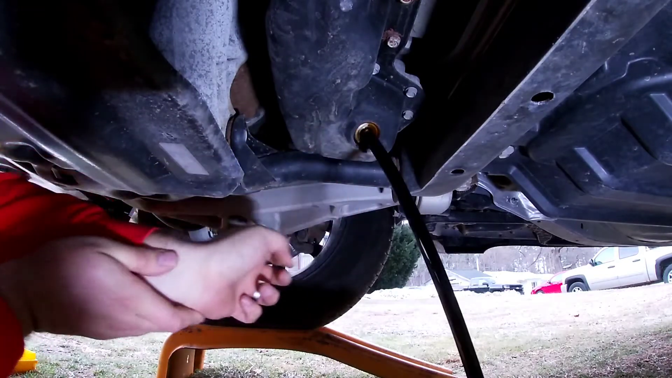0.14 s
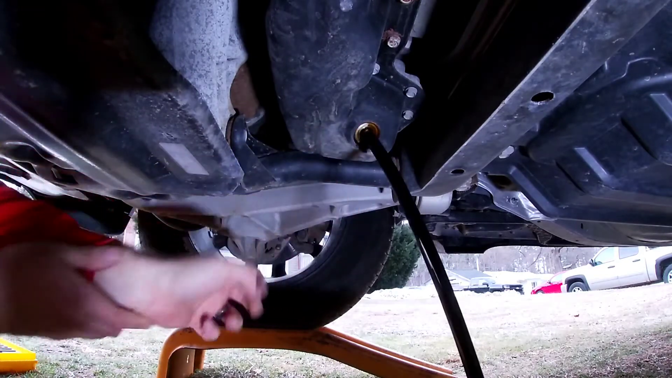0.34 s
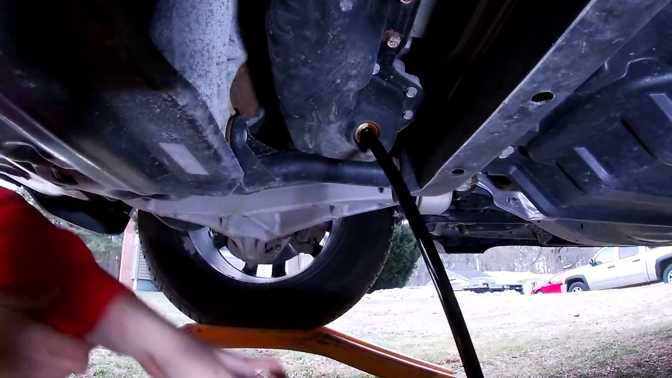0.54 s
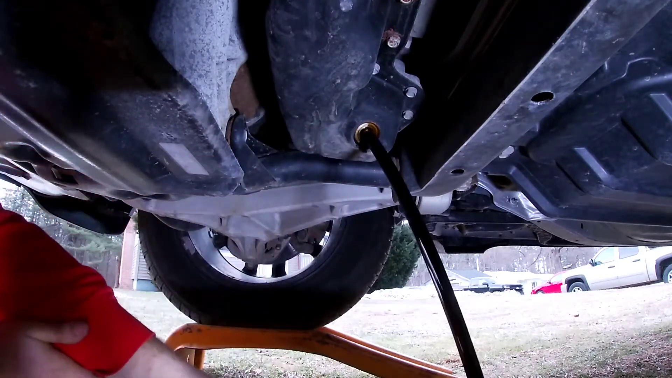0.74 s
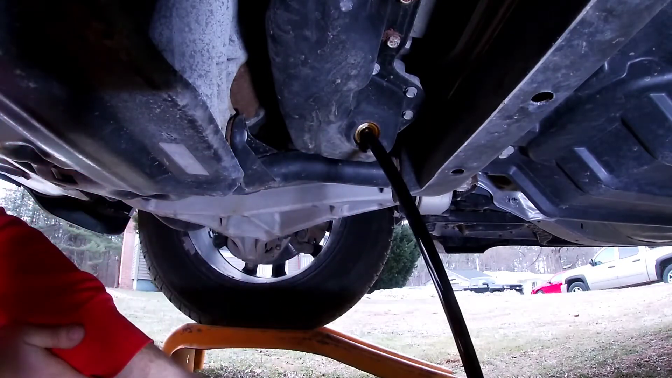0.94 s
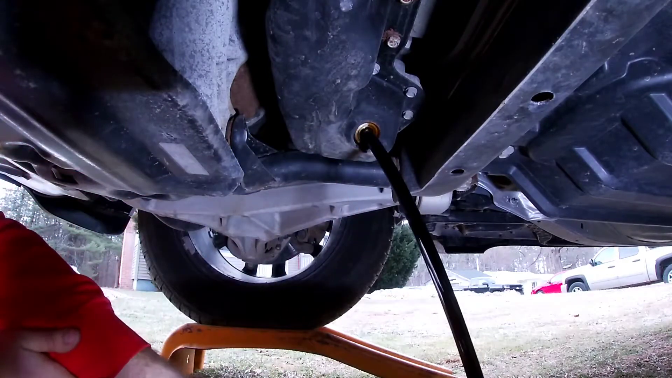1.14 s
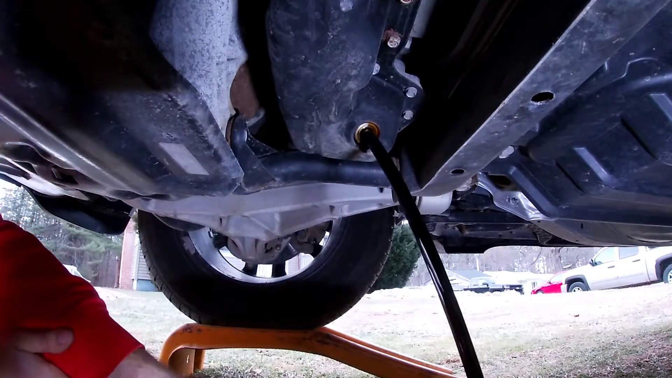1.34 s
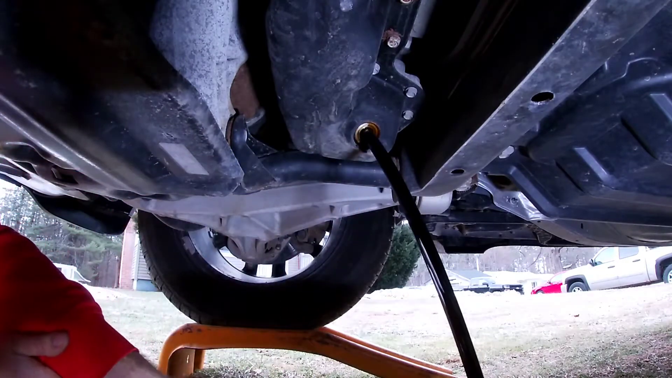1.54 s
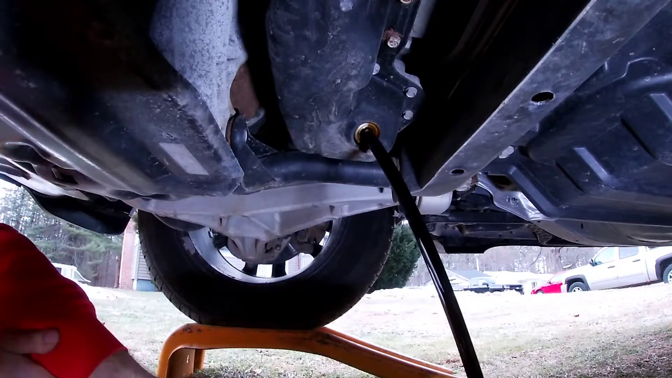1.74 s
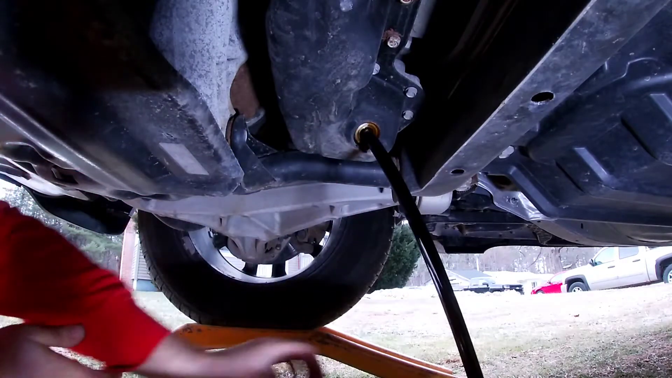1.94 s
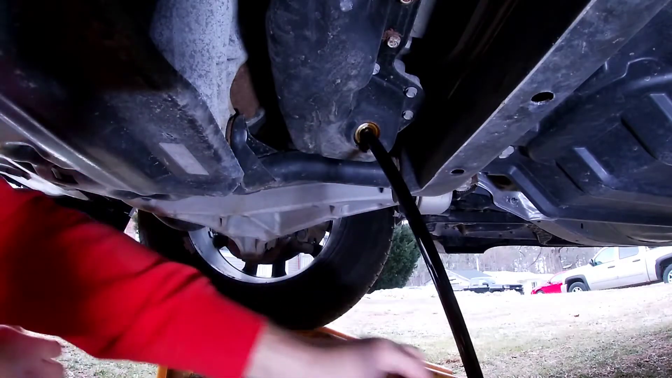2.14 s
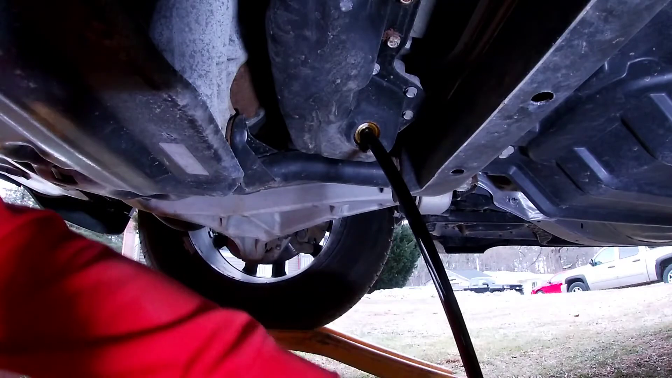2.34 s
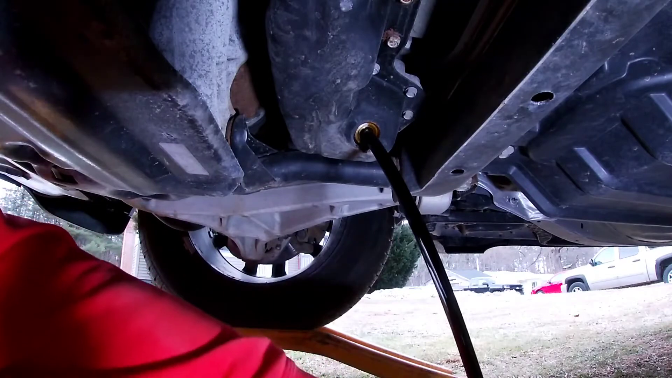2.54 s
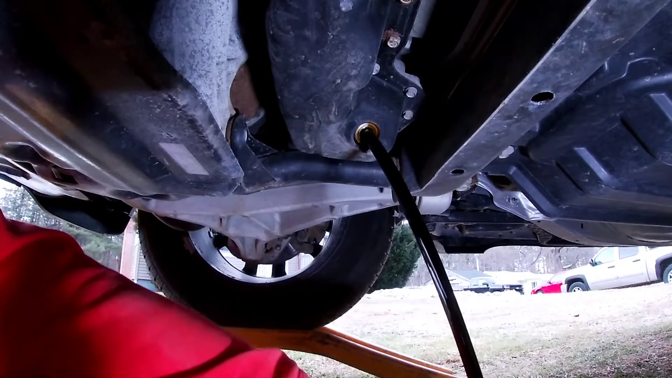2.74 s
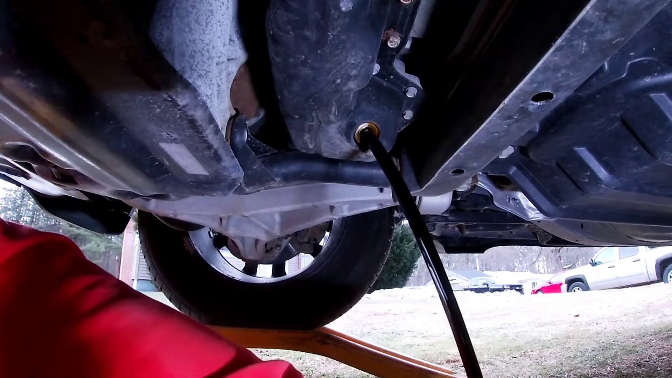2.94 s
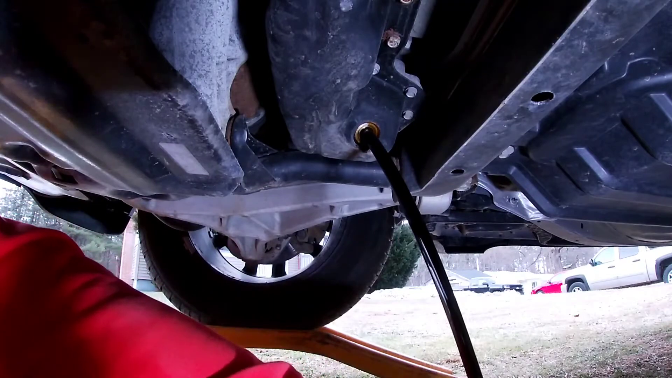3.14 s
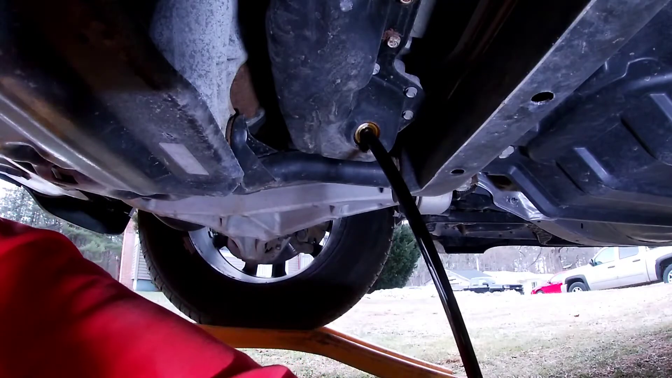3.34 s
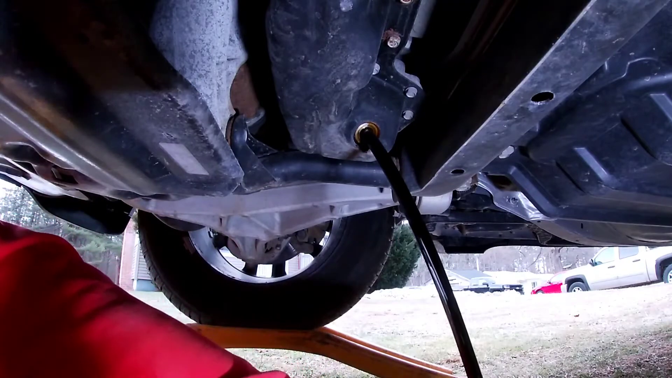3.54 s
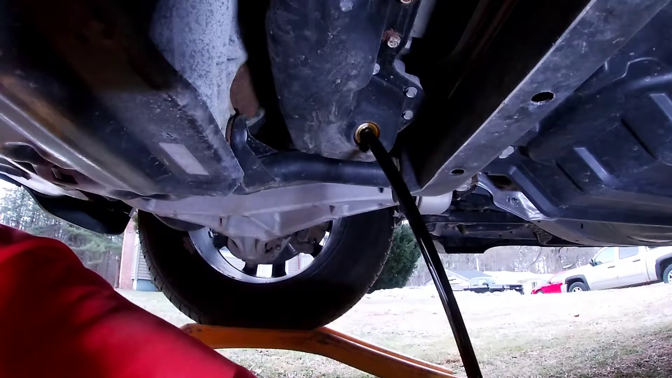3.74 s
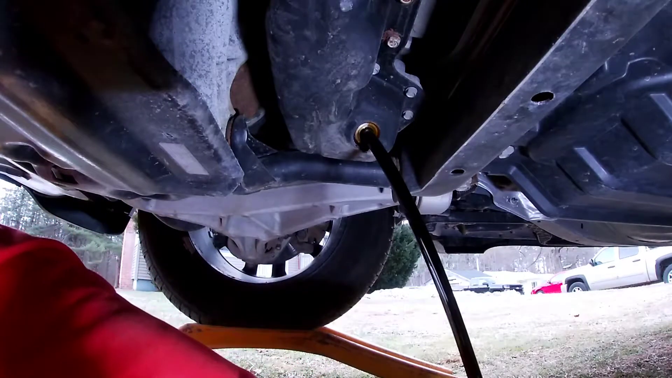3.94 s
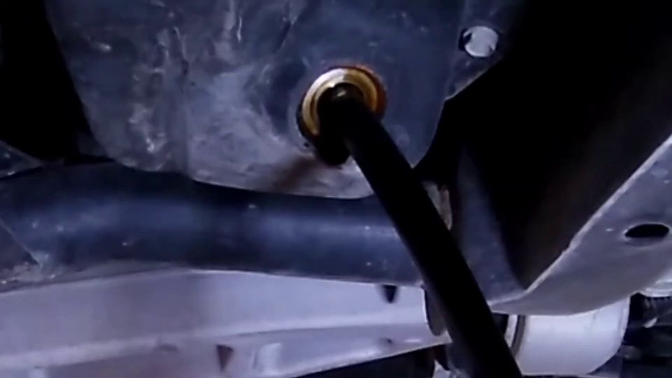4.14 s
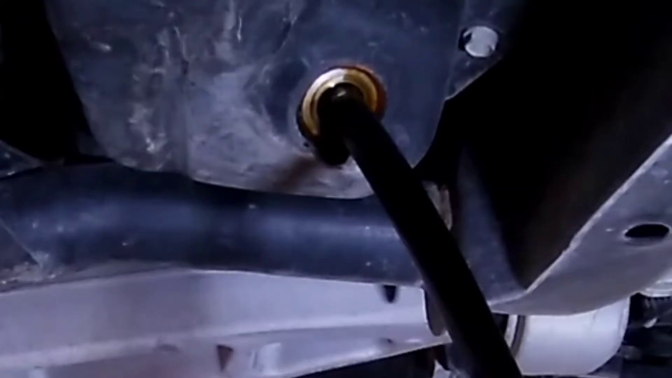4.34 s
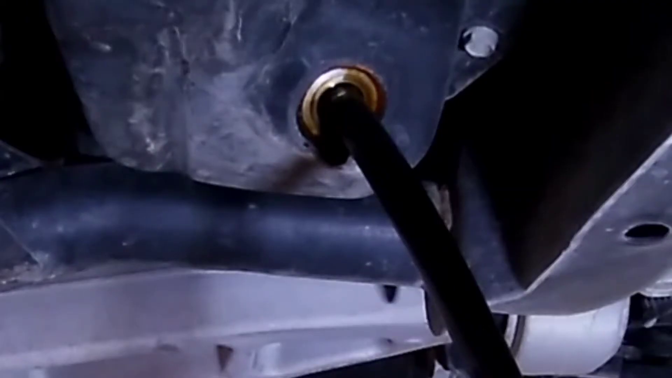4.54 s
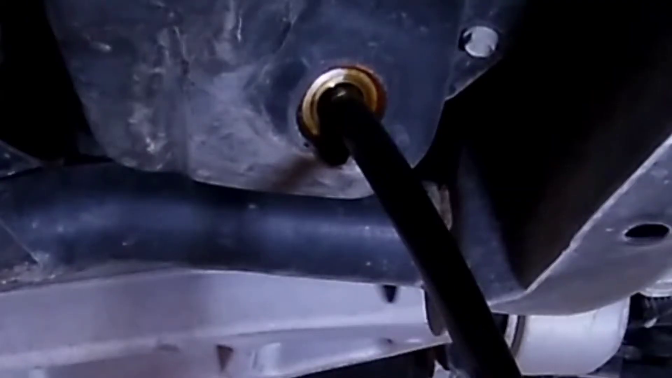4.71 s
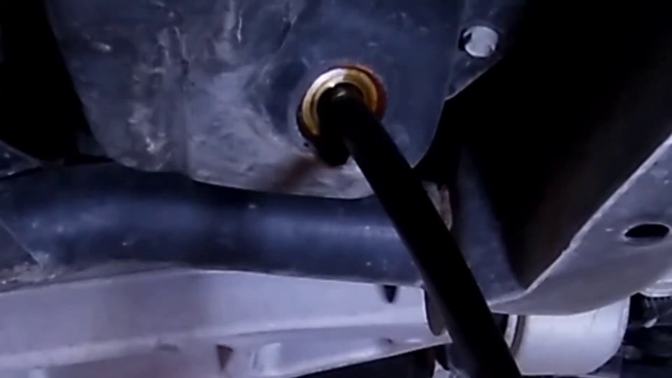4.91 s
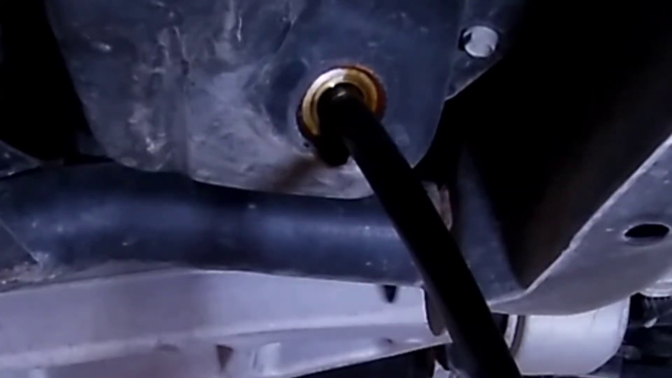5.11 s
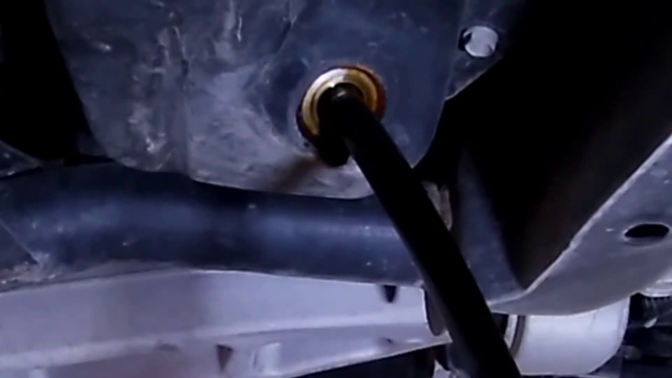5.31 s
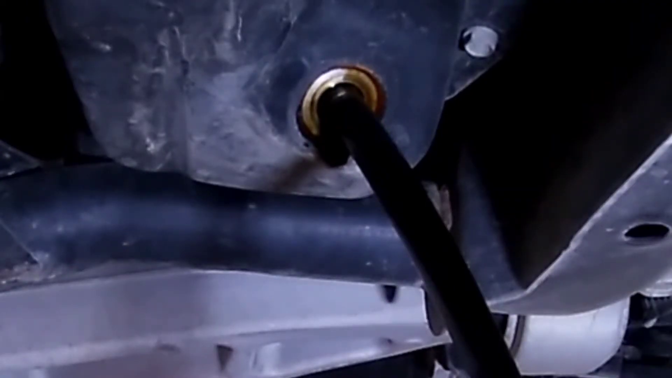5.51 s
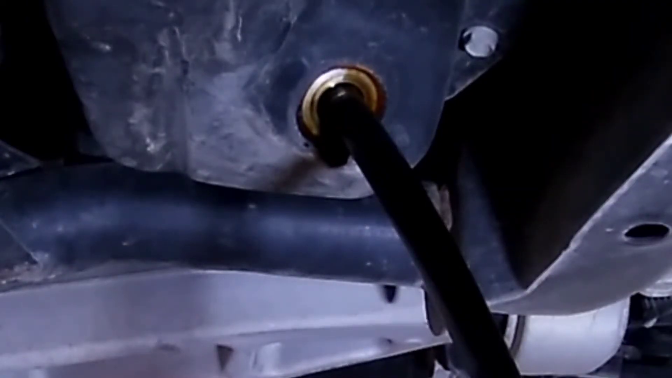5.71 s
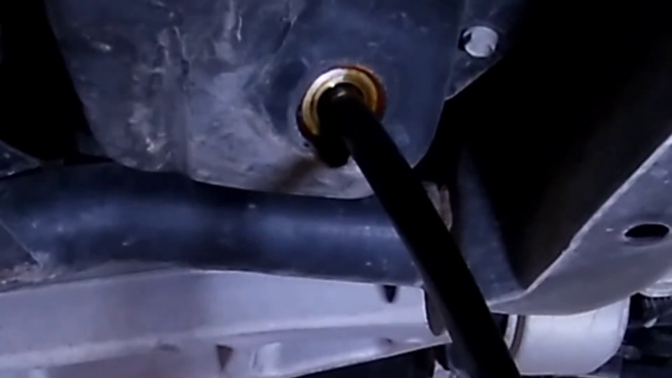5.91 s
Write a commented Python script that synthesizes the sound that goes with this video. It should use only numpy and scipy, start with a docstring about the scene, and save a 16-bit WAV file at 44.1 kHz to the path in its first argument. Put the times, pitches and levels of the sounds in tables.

```python
"""Under a car outdoors, close to the pan: far traffic and faint air lie behind a thin sizzle of landing oil. A
drain plug scrapes free as dying steel tones fed by grit, then knocks about in a plastic pan's modes. A sleeve
brushes by now and then as cloth hiss; the oil, noise coloured by the pan, soon slaps and pops, its bubbles
short gliding tones, a few lumps of it thud into the pan, and late on the pool gulps low. Ground and car floor
give the near sounds a short echo; a small microphone dulls the treble."""
import sys
import numpy as np
from scipy import signal
from scipy.fft import rfft, irfft, next_fast_len
from scipy.io import wavfile
from scipy.ndimage import uniform_filter1d, map_coordinates

SR = 44100
rng = np.random.default_rng(int(sys.argv[2]) if len(sys.argv) > 2 else 0)


def materialize(psi):
    """Save the field psi as 16-bit PCM at rate SR to the path in sys.argv[1].

    A 1-D psi becomes a single channel; in a 2-D psi each row is a channel.
    """
    bounded = np.clip(np.atleast_2d(psi).T, -1, 1)
    quanta = np.round(bounded * 32767).astype(np.int16)
    wavfile.write(sys.argv[1], SR, quanta)


N = 267687

# lumps of oil slapping the pool: (time [s], level [dB], pitch [Hz])
SLAP_EVENTS = [(1.949, -35.5, 2240), (2.033, -34, 1650), (2.108, -37, 1770), (2.24, -34, 1070),
               (2.344, -37, 1616), (2.366, -36, 1640), (2.515, -36.5, 987), (2.628, -42.5, 1374),
               (2.915, -38, 1660), (3.09, -41.5, 1046), (3.127, -38.5, 1670), (3.416, -39.5, 2616),
               (3.487, -38, 1645), (3.844, -41, 1610), (4.069, -42, 1630), (4.155, -34.5, 2220),
               (4.42, -37, 1030), (4.474, -37, 2640), (4.815, -31.5, 2650), (4.848, -30, 2690),
               (4.958, -33, 2540), (4.994, -36.5, 2640), (5.065, -37, 1640), (5.137, -40, 1610),
               (5.176, -37.5, 2620), (5.504, -41, 944), (5.567, -37, 1004), (5.781, -35, 967),
               (5.83, -38, 2910), (5.959, -38.5, 2520)]
# bubbles popping: (time [s], level [dB], pitch [Hz])
POP_EVENTS = [(1.8777, -44, 7940), (1.9284, -39, 3780), (2.0351, -32.5, 2980), (2.2337, -33.5, 5400),
              (2.3656, -33.5, 7830), (2.4207, -38.5, 6630), (2.521, -33, 3000), (2.6285, -36.5, 6350),
              (2.7714, -41.5, 5720), (3.0299, -35.5, 7420), (3.0902, -32.5, 3430), (3.144, -40, 3780),
              (3.2552, -31, 2964), (3.3309, -36, 4050), (3.407, -33, 4790), (3.4489, -34.5, 7700),
              (3.4798, -33, 8100), (3.598, -39, 6640), (3.6709, -39, 5560), (3.7584, -39.5, 3620),
              (3.839, -34, 3310), (4.0715, -29, 6660), (4.1039, -57, 5270), (4.1204, -30.5, 8270),
              (4.43, -31.5, 7440), (4.4735, -33.5, 6180), (4.6733, -38.5, 4330), (4.7416, -38, 4730),
              (4.8028, -38, 3900), (4.813, -35, 3150), (4.8477, -28.5, 3200), (4.9898, -33, 5920),
              (5.0033, -33, 4750), (5.068, -45, 5600), (5.176, -32, 6320), (5.289, -36, 7300),
              (5.3715, -31, 4120), (5.4254, -31, 6150), (5.5058, -26.5, 5800), (5.542, -38.5, 3830),
              (5.6745, -29.5, 4870), (5.7811, -30, 3550), (5.834, -31, 3630), (5.8624, -44, 4300),
              (5.8923, -38.5, 6200), (5.9596, -39.5, 4980), (6.0205, -33, 6060), (6.033, -31.5, 6000)]
# response of the small microphone: (frequency [Hz], level [dB])
MIC_RESPONSE = [(20, -1), (7000, 1), (8500, -8.5), (10000, -24.5), (12500, -36), (15000, -55.5)]


def amp(db):
    """Amplitude of a level in dB."""
    return 10 ** (np.asarray(db) / 20)


def unit(x):
    """x at an rms of 1."""
    return x / np.sqrt(np.mean(x ** 2) + 1e-20)


def along(points, hz):
    """Curve through (Hz, value) points on a log frequency axis."""
    f, v = np.transpose(points)
    return np.interp(np.log(hz + 1), np.log(f + 1), v)


def curves(rows):
    """One value per sample for each column after the time."""
    s, *cols = np.transpose(rows)
    return [np.interp(np.arange(N) / SR, s, c) for c in cols]


def wobble(rate):
    """A smooth random curve, rate knots a second."""
    knots = rng.standard_normal(int(N * rate / SR) + 4)
    return map_coordinates(knots, [np.arange(N) * rate / SR])


def filtered(x, response):
    """x shaped by a response of frequency."""
    m = next_fast_len(N + SR // 2)
    return irfft(rfft(x, m) * response(np.fft.rfftfreq(m, 1 / SR)), m)[..., :N]


def microphone(hz):
    """Amplitude the microphone passes at each frequency."""
    return amp(along(MIC_RESPONSE, hz))


def at_microphone(x, spectrum):
    """x given a spectrum as picked up: its rms is 1 once the microphone has dulled it."""
    x = filtered(x, lambda f: amp(along(spectrum, f) - along(MIC_RESPONSE, f)))
    return x / np.std(filtered(x, microphone))


def ring(modes, t, damping, tilt_db=0, detune=0.019, spread_db=2):
    """Dying sines at new strengths, signs and slightly new pitches, peak 1; damping divides each t60."""
    hz, db, t60 = np.transpose(modes)[:, :, None]
    strength, pitch, sign = rng.standard_normal((3, len(modes), 1))
    level_db = db + tilt_db + spread_db * strength - 60 * t * damping / t60
    tones = np.sin(2 * np.pi * hz * (1 + detune * pitch) * t)
    x = np.sum(np.sign(sign) * amp(level_db) * tones, axis=0)
    return x / np.abs(x).max()


def add(out, s, x):
    """Mix x into out from second s."""
    out[round(s * SR):][:len(x)] += x


def crackle(rate, spread_db):
    """Tiny impacts of unequal size, rate a second on average."""
    hit = rng.random(N) < rate / SR
    return hit * rng.standard_normal(N) * amp(spread_db * np.minimum(rng.exponential(size=N), 2))


def spatter(rate, t60):
    """Loudness of ragged bursts: each starts fast and dies away."""
    t = np.arange(SR // 10) / SR
    burst = amp(-60 * t / t60) * (1 - np.exp(-t / 0.00096))
    return unit(signal.fftconvolve(np.abs(crackle(rate, spread_db=0.0)), burst)[:N])


def patchy(x, depth_db):
    """Small patches of time and pitch swell and sink at random."""
    z = signal.stft(x, nperseg=256)[2]
    field = uniform_filter1d(rng.standard_normal(z.shape), size=5, axis=0)  # smooth in pitch
    field = uniform_filter1d(field, size=10, axis=1)  # smooth in time
    return signal.istft(z * amp(depth_db * unit(field)), nperseg=256)[1][:N]


def wash(events, under_db):
    """Loudness of the brief swell of noise after each event, under_db relative to the event's level."""
    rise_s, t60_s = 0.0064, 0.083
    out, t = np.zeros(N + SR), np.arange(SR // 3) / SR
    for s, db, _ in events:
        power = amp(2 * (db + under_db - 60 * t / t60_s)) * (1 - np.exp(-t / rise_s))
        add(out, s, power)
    return np.sqrt(out[:N])


def blip(hz, t60, rise, noisy):
    """A burst bubble: a short unsteady tone gliding upward, with a puff of spray at its start."""
    t = np.arange(SR // 12) / SR
    shake = unit(uniform_filter1d(rng.standard_normal((2, len(t))), size=30, axis=1))
    phase = 2 * np.pi * hz * t * (1 + rise * t / t60) + 0.47 * shake[0]
    tone = np.sin(phase) * (1 + 0.36 * shake[1])
    puff = noisy * amp(-60 * t / 0.024) * np.diff(rng.standard_normal(len(t) + 1))
    return (1 - np.exp(-t / .0007)) * (amp(-60 * t / t60) * tone + puff)


def open_air():
    """A faint even hiss of the open air, noise with its bass rolled off."""
    return amp(-75) * unit(filtered(rng.standard_normal(N), lambda f: (f / (f + 1500)) ** 2))


def traffic():
    """A low far rumble of drifting noise; its deepest part, a narrow band, throbs by itself."""
    # spectrum of the far rumble: (frequency [Hz], density [dB per Hz])
    rumble_spectrum = [(12, -33), (20, -8.5), (54, -0.5), (81, -6), (107, -2.5), (163, -4), (204, -8.5),
                       (428, -18.5), (660, -22), (700, -20.5), (910, -29.5), (1540, -120)]
    rumble = unit(filtered(rng.standard_normal(N), lambda f: amp(along(rumble_spectrum, f))))
    deep = unit(filtered(rng.standard_normal(N), lambda f: 1 / (1 + ((f - 58) / 9) ** 2)))
    throb = amp(0.9 * wobble(9.4)) * deep
    level_db = -58.5 - 1.1 * wobble(9.6) + 1.3 * wobble(12)
    return amp(level_db) * (rumble + 0.52 * throb)


def sleeve():
    """A sleeve brushes past the ground and the car: smooth strokes of cloth hiss that swell and stop short."""
    # strokes: (start [s], length [s], level at the microphone [dB])
    strokes = [(.4, 0.13, -66), (0.536, 0.14, -58.5), (1.114, 0.17, -57.5), (1.615, 0.24, -63.5),
               (2.032, 0.16, -52), (4.425, 0.12, -63), (5.306, .31, -55.5)]
    # spectrum of the cloth at the microphone: (frequency [Hz], density [dB per Hz])
    cloth_spectrum = [(600, -32), (1500, 1.5), (3500, -1.5), (6000, -1.5), (8000, -2.5), (9500, -19),
                      (12500, -32), (20000, -120)]
    swell_share, stop_s = 0.64, 0.0065  # share of the stroke spent swelling; its sudden end
    t = np.arange(N) / SR
    loudness = np.zeros(N)
    for s, length, db in strokes:
        swell = (t - s) / (swell_share * length)
        stop = (s + length - t) / stop_s
        loudness += amp(db) * np.clip(np.minimum(swell, stop), 0, 1)
    hiss = patchy(rng.standard_normal(N), depth_db=0.7)
    return loudness * at_microphone(hiss, cloth_spectrum)


def scrape():
    """The plug leaves its thread: gritty threads rub and keep the steel ringing."""
    # modes of the plug and its seat: (frequency [Hz], level [dB], t60 [s])
    steel_modes = [(635, -8, .1), (921, -4, .11), (1090, -8, .05), (1500, -6, .035), (1780, -7, .04),
                   (2024, -1, .035), (2360, -3, .035), (2720, 4, .06), (3000, -5, .03), (3530, -43, .9),
                   (3575, -45, .7)]
    loudest_s, loudest_db, rise_db_per_s, fall_db_per_s = 0.061, -23, 749.5, 895.5
    lag = np.arange(N) / SR - loudest_s
    level_db = loudest_db + np.minimum(rise_db_per_s * lag, -fall_db_per_s * lag)
    grit = amp(level_db) * unit(crackle(rate=10000, spread_db=4.0))
    steel = ring(steel_modes, np.arange(SR // 2) / SR, damping=1, detune=0, spread_db=0)
    steel[0] = 3.3  # the bare grit is heard too
    rub = signal.fftconvolve(grit, steel / np.linalg.norm(steel))[:N]
    return signal.sosfilt(signal.butter(4, 520, "high", fs=SR, output="sos"), rub)


def favour_db(modes, hz, slope_db):
    """The spot struck favours modes near hz: the rest lose slope_db per octave of distance."""
    return -slope_db * np.abs(np.log2(np.array(modes)[:, :1] / hz))


def knocks():
    """The plug chatters for a few milliseconds as it knocks about, and later a few lumps of oil thud into the
    pan: each blow cracks, shakes the walls and booms in the bowl."""
    # blows of the plug, and from 3.2 s lumps of oil thudding: (time [s], level [dB], boom before trim [dB],
    # crack before trim [dB], favoured wall pitch [Hz])
    blows = [(0.281, -33.5, -26, -19, 1650), (0.29, -29.5, -7, -10, 1660), (0.31, -20.5, -3, -2.5, 800),
             (0.318, -1, -5, -13.5, 1360), (0.444, -33, -21, -26, 1740), (0.467, -40, -14, 0.5, 1270),
             (0.521, -12, -7, -30, 630), (0.535, -9, -3.5, -5.5, 1200), (0.548, -21.5, 0.5, -16, 1410),
             (0.583, -18.5, -7, -12, 1220), (0.608, -27, -3.5, -36, 1080), (0.666, -43, 2.5, -10, 1180),
             (0.809, -22.5, 0, -37, 1500), (0.819, -18, -7.5, -42, 800), (0.841, -25.5, -14, -40, 1130),
             (0.854, -30, -7, -35, 1080), (0.873, -35.5, -5, -14, 1020), (0.988, -37.5, -26, -20, 1520),
             (1.041, -45.5, -19, -25, 1440), (1.359, -28, -25, -4.5, 1270), (1.381, -43, 1, 10.5, 1350),
             (1.403, -39, -5, -20, 1040), (2.13, -42, 0.5, -12, 1650), (3.257, -16, -16.5, -18, 1230),
             (4.583, -31, -14.5, -31, 1300), (4.628, -33.5, -14, -12, 1110)]
    # modes of the pan's walls: (frequency [Hz], level [dB], t60 before damping [s])
    wall_modes = [(683, -3.5, 0.0073), (806, 2.5, 0.018), (1040, -12, 0.07), (1179, 0, 0.034),
                  (1315, -4.5, 0.03), (1475, 5, 0.022), (1627, -15.5, 0.022), (1667, 3.5, 0.0086),
                  (2040, -25.5, 0.011), (2130, -8, 0.0075), (2470, -17, .03), (2612, -8.5, 0.04),
                  (2980, -14.5, 0.063)]
    # modes of the bowl: (frequency [Hz], level [dB], t60 before damping [s])
    bowl_modes = [(56, -10, .2), (77, -6, .2), (120, -7, .13), (160, -3, .14), (230, -4, .1),
                  (280, -7, .07), (325, -3, .08), (425, -3, .07), (540, -10, .045)]
    wall_damping, bowl_damping = 0.96, 0.58  # factors on the modes' decay speed
    bowl_best_hz = 189
    jam_db = 3  # a blow this hard halves the ring of the walls
    out, t = np.zeros(N + SR), np.arange(SR // 3) / SR
    bright = signal.butter(2, 3000, "high", fs=SR, output="sos")
    for s, db, boom_db, crack_db, wall_hz in blows:
        # a hard blow presses the pan to the ground and shortens the ring of its walls
        jam = 1 + amp(db - jam_db)
        chatter = amp(-60 * t[:SR // 20] / 0.017) * rng.standard_normal(SR // 20)
        wall_tilt_db = favour_db(wall_modes, wall_hz, slope_db=7.5)
        walls = ring(wall_modes, t, wall_damping * jam, wall_tilt_db)
        walls = signal.fftconvolve(walls, chatter)[:len(t)]

        middle = signal.butter(2, [wall_hz / 3.7, wall_hz * 1.69], "band", fs=SR, output="sos")
        rattle_fall = 0.53 * amp(-60 * t * jam / 0.073) + 0.149 * amp(-60 * t / 0.087)
        rattle = rattle_fall * signal.sosfilt(middle, rng.standard_normal(len(t)))

        # the pan rocks on the ground
        loose = 1 + 0.45 * unit(uniform_filter1d(rng.standard_normal(len(t)), size=250))
        loose *= 1 + 2.35 * amp(-60 * t / 0.047)  # and gives most of its boom at once
        boom = ring(bowl_modes, t, bowl_damping, favour_db(bowl_modes, bowl_best_hz, slope_db=5.5))
        boom *= loose * (1 - np.exp(-t / 0.0021))

        crack_fall = amp(-60 * t / 0.02) + 0.094 * amp(-60 * t / 0.015)
        crack = crack_fall * signal.sosfilt(bright, rng.standard_normal(len(t)))

        blow = walls / np.abs(walls).max() + rattle
        blow += amp(boom_db - 8) * boom + amp(crack_db - 0.5) * crack
        add(out, s, amp(db) * blow)
    # a small pan radiates no deep bass
    return signal.sosfilt(signal.butter(2, 40, "high", fs=SR, output="sos"), out[:N])


def glugs():
    """The pool gulps: soft low notes of trapped air, each with an overtone and a thin gurgle singing over it."""
    # gulps: (time [s], level [dB], pitch [Hz])
    gulps = [(5.408, -31.5, 330), (5.421, -22.5, 229), (5.436, -28, 218), (5.449, -31, 263),
             (5.464, -36, 454)]
    t60_s = 0.043
    out = np.zeros(N + SR)
    for s, db, hz in gulps:
        gulp = blip(hz, t60_s, rise=0.083, noisy=0)
        overtone = amp(-9) * blip(2.38 * hz, t60_s, rise=0.11, noisy=0)
        gurgle = amp(-13) * blip(1168, t60=0.1, rise=0.12 * 0.1 / 0.1, noisy=0)
        add(out, s, amp(db) * (gulp + overtone + gurgle))
    return signal.sosfilt(signal.butter(2, 1800, fs=SR, output="sos"), out[:N])


def bubbles(spray_db):
    """The loud slaps and pops, over a random scatter of small bubbles that follows the spray."""
    out = np.zeros(N + SR)
    for s, db, hz in SLAP_EVENTS:
        add(out, s, amp(db) * blip(hz, t60=0.033, rise=0.038, noisy=0.11))
    for s, db, hz in POP_EVENTS:
        add(out, s, amp(db) * blip(hz, t60=0.022, rise=0.033, noisy=0.49))
    when, pitch, size = rng.random((400, 3)).T
    for at, p, z in zip(when * (N - 1), pitch, size):
        hz = 1200 * 5.3 ** p
        level_db = spray_db[int(at)] - 4.5 - 7.8 * np.log(z + 0.031)  # a few are much louder
        add(out, at / SR, amp(level_db) * blip(hz, 60 / hz, rise=0.32, noisy=0.25))
    return out[:N]


def stream():
    """The landing oil is a rough noise in ragged bursts; the pan picks out its own notes."""
    # the stream landing, before drift: (time [s], sizzle in the pan [dB], fine spray at the microphone [dB])
    flow = [(0, -55, -63.5), (.12, -61, -70.5), (.3, -61.5, -73), (.62, -54.5, -63), (.75, -73.5, -75.5),
            (.87, -62, -67), (1.2, -60.5, -68), (1.5, -63, -66), (1.57, -63.5, -71.5), (1.67, -59, -63),
            (1.9, -62.5, -73), (2.05, -61.5, -59.5), (2.28, -53.5, -58.5), (2.87, -59, -62),
            (3.31, -56, -58), (3.7, -57.5, -61.5), (4.05, -55.5, -54.5), (4.2, -55, -65),
            (4.36, -64.5, -56), (4.67, -54, -54.5), (5.2, -55, -52.5), (5.27, -57.5, -55), (5.5, -48, -52),
            (5.65, -57, -61.5), (5.8, -52, -50.5), (6.07, -55.5, -59.5)]
    # air and walls of the pan: (frequency [Hz], width [Hz], level [dB])
    pan_notes = [(794, 50, -15), (846, 25, -7), (1002, 61, -5.5), (1220, 7.1, 2), (1368, 35, 1),
                 (1636, 100, 2), (2130, 32, -1), (2340, 90, -1), (2700, 140, 2.5), (3170, 210, -5)]
    # spectrum of the sizzle ahead of the pan's notes: (frequency [Hz], density [dB per Hz])
    body_spectrum = [(250, -62.5), (500, -30), (720, 0.5), (1500, -6), (3200, -16.5), (4500, -14),
                     (7000, -55.5)]
    # spectrum of the spray at the microphone: (frequency [Hz], density [dB per Hz])
    spray_spectrum = [(1650, -36), (2800, 0), (2930, -8.5), (3180, -4), (3380, -5), (4240, -8.5),
                      (4670, -6), (5180, -5.5), (6600, -6), (7580, -6), (9090, -18), (11800, -36),
                      (20000, -120)]
    pan_db, spray_db = curves(flow)
    drift, surge, bursts = wobble(9), wobble(25), spatter(rate=31, t60=0.056)

    def in_pan(f):
        """Sizzle spectrum with the pan's resonances standing out."""
        power = sum(amp(2 * db) / (1 + (2 * (f - hz) / w) ** 2) for hz, w, db in pan_notes)
        return amp(along(body_spectrum, f)) * (0.3 + np.sqrt(power))

    patter = (.9 + .3 * bursts + .25 * spatter(rate=30, t60=.08)) * rng.standard_normal(N)
    body = unit(filtered(patchy(patter, depth_db=1.77), in_pan))

    fizz = (0.43 + 0.47 * bursts + 0.45 * spatter(rate=110, t60=0.02)) * rng.standard_normal(N)
    fizz += 0.39 * unit(crackle(rate=1100, spread_db=5.5))
    spray = at_microphone(patchy(fizz, depth_db=3.0), spray_spectrum)

    # every slap throws up a wash of sizzle, every pop a wash of spray
    sizzle = np.hypot(amp(pan_db + 1.2 * drift), wash(SLAP_EVENTS, under_db=-18.5))
    sizzle *= amp(0.46 * surge)
    mist = np.hypot(amp(spray_db + 1.8 * drift), wash(POP_EVENTS, under_db=-16.5))
    mist *= amp(0.7 * surge)
    return sizzle * body + mist * spray + bubbles(spray_db + 1.4 * drift)


def under_car(x):
    """A short dull echo between ground and floor pan: a dying tail of softened noise."""
    t = np.arange(SR // 4) / SR
    tail = signal.lfilter([1], [1, -.5], rng.standard_normal(len(t)))
    tail *= amp(-60 * t / 0.059) * (t > .003)
    return signal.fftconvolve(x, tail / np.linalg.norm(tail))[:N]


def scene():
    """The near sounds and their echo under the car, with traffic and air behind."""
    near = scrape() + knocks() + stream() + glugs() + sleeve()
    return (near + amp(-14.0) * under_car(near) + traffic() + open_air())[None]


def record(dry):
    """The hardest blow squeezes against the input's ceiling; the small microphone falls off in the treble."""
    squeezed = dry / (1 + np.abs(dry / .9) ** 4) ** (1 / 4)
    return filtered(squeezed, lambda hz: microphone(hz) * (hz < 15500))  # nothing above 15.5 kHz


dry = scene()
out = record(dry)
materialize(out)
```